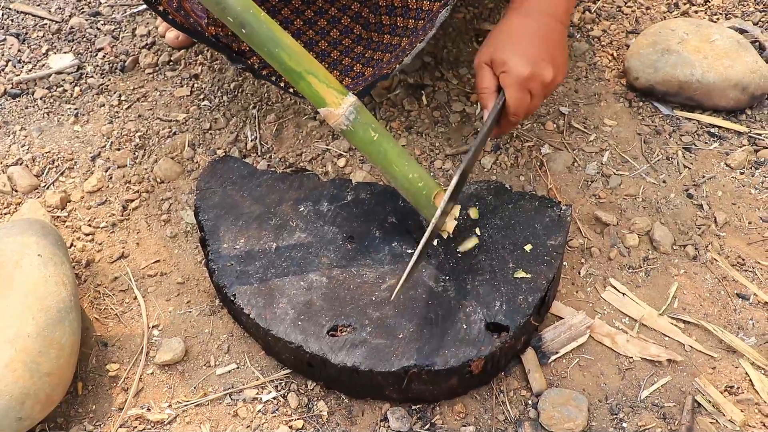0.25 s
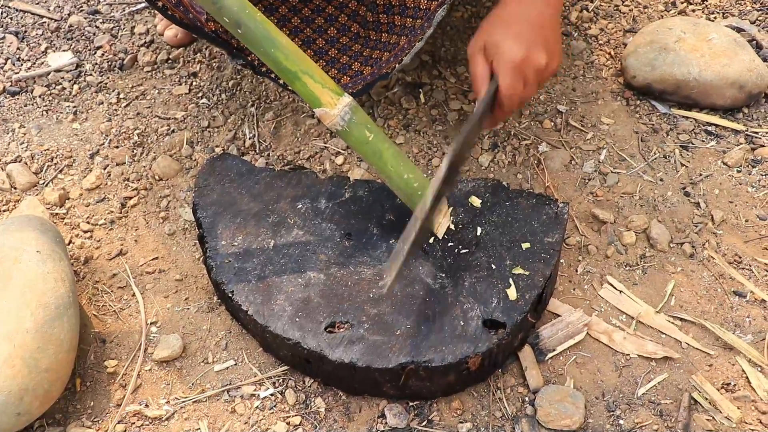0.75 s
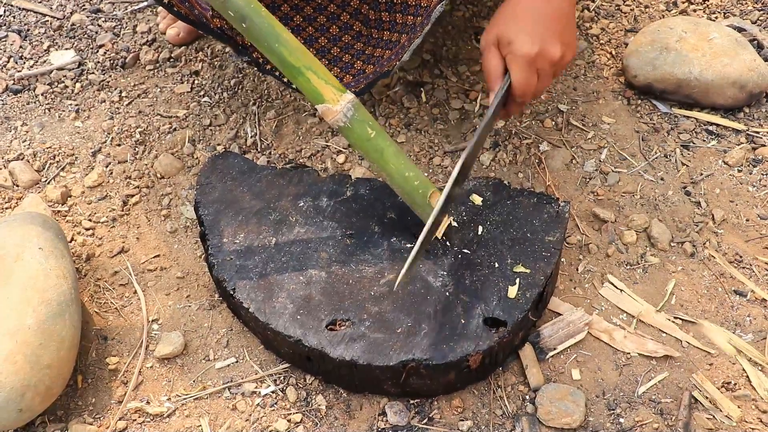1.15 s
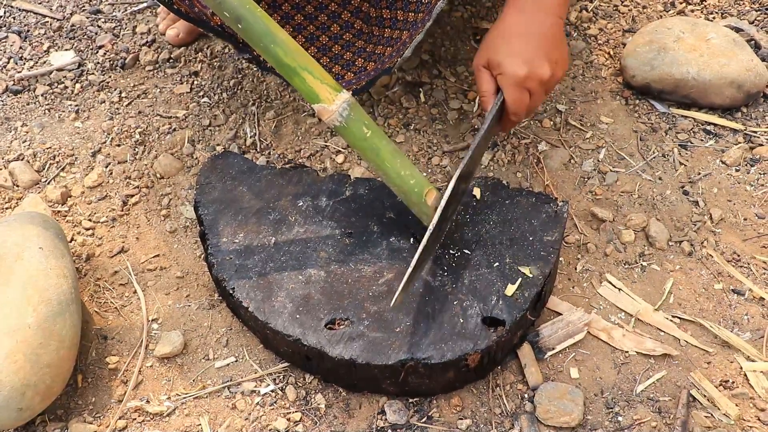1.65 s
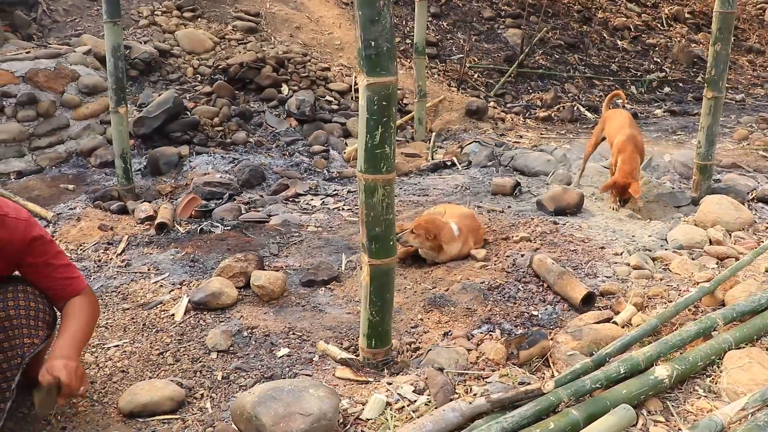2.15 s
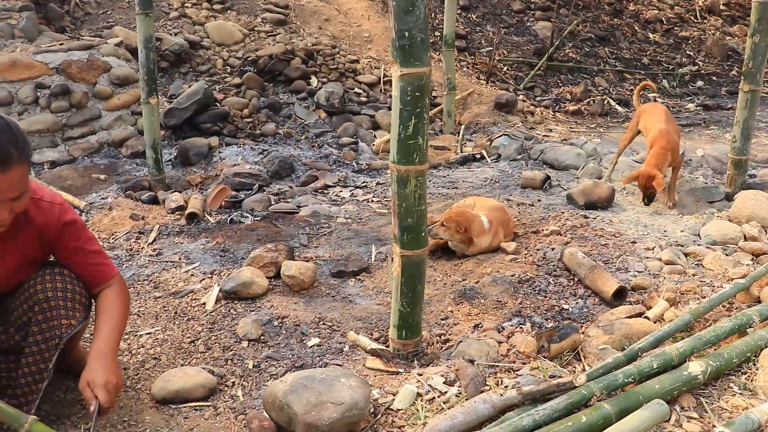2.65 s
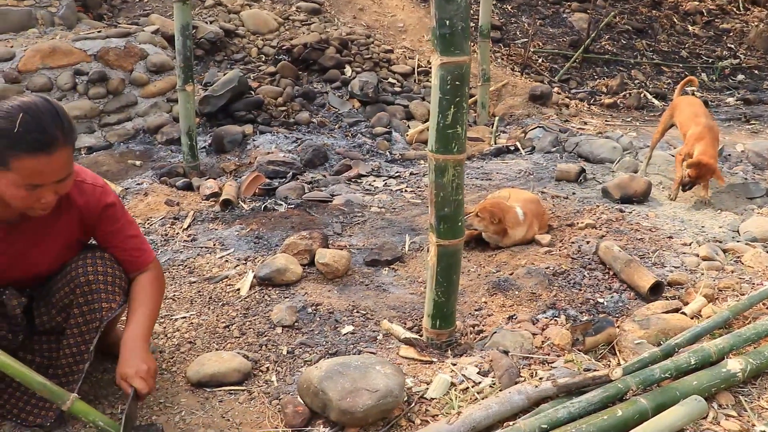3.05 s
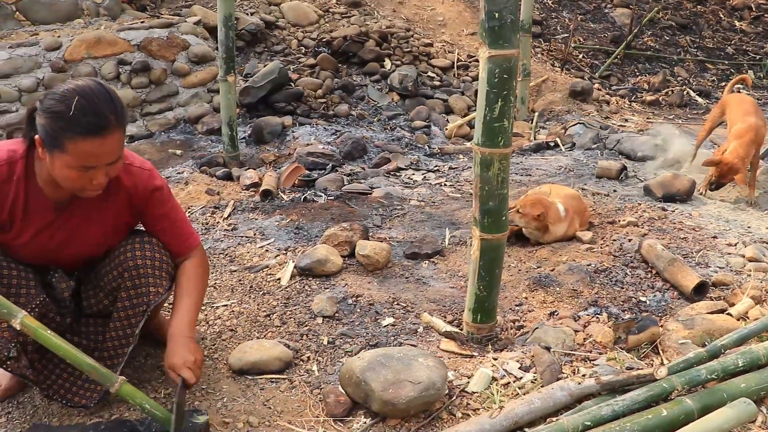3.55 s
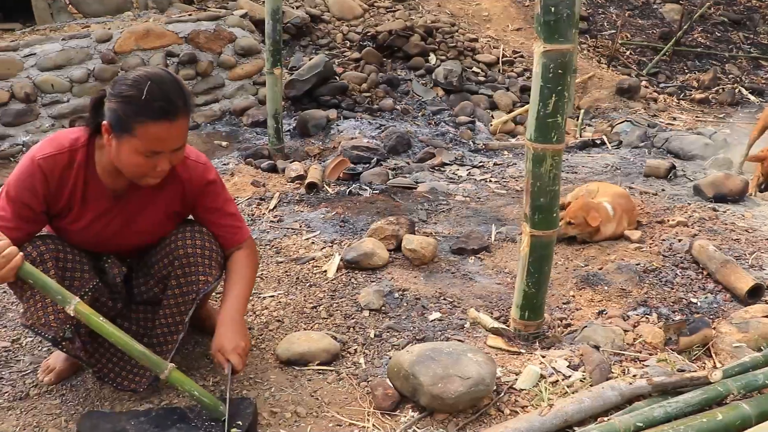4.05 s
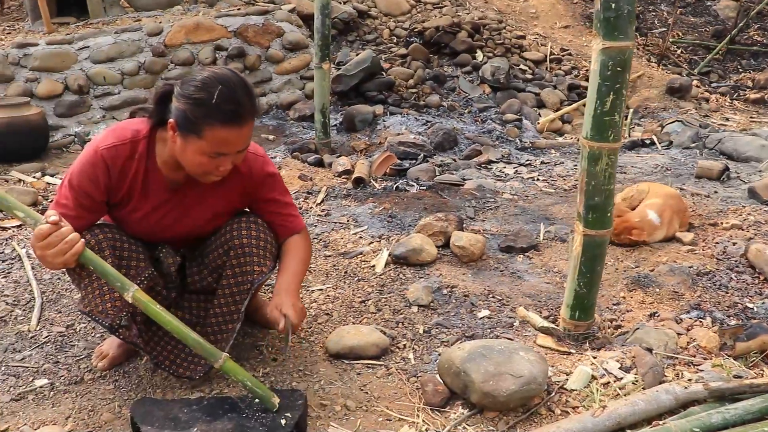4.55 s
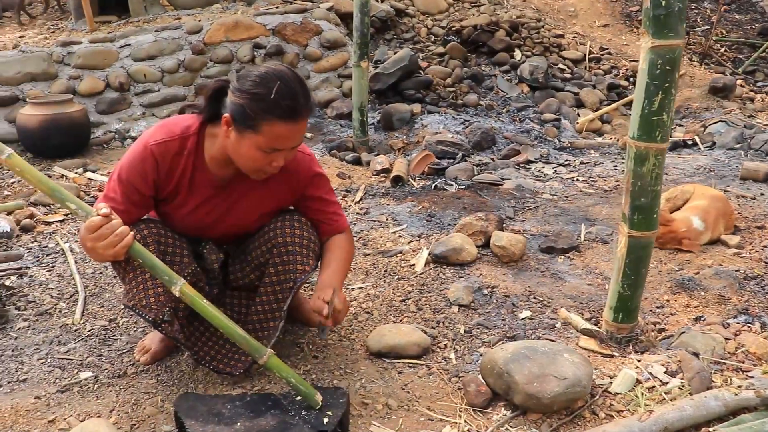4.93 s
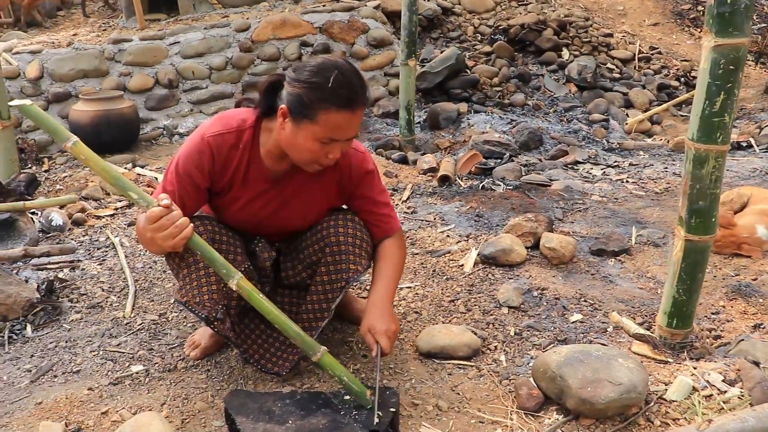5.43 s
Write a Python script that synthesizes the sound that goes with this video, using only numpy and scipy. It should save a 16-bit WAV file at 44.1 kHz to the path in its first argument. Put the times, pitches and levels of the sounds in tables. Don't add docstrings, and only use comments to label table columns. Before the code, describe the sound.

A heavy blade chops green bamboo on a wooden block outdoors while a chick peeps, then chopping continues slightly further off after a brief silence.

```python
import sys
import numpy as np
from scipy import signal
from scipy.io import wavfile
from scipy.ndimage import uniform_filter1d

SR = 44100
rng = np.random.default_rng(int(sys.argv[2]) if len(sys.argv) > 2 else 0)


def voltage_ratio(decibels):
    exponent = np.asarray(decibels, float) / 20
    return 10 ** exponent


def int16_out(signal):
    q = np.round(np.clip(np.atleast_2d(signal).T, -1, 1) * 32767)
    wavfile.write(sys.argv[1], SR, q.astype(np.int16))


N = 250929

GAP = (1.666, 1.869)


def evened(x):
    return x / np.sqrt(np.mean(x ** 2) + 1e-20)


def peaked(x):
    return x / (abs(x).max() + 1e-20)


def read(points, hz):
    f, value = np.transpose(points)
    return np.interp(np.log(hz + 1), np.log(f + 1), value)


def add(mix, s, sound):
    part = mix[round(s * SR):][:len(sound)]
    part += sound[:len(part)]


def ring(modes):
    t = np.arange(SR // 8) / SR
    return sum(voltage_ratio(db - 60 * t / t60) * np.sin(2 * np.pi * hz * t) for hz, db, t60 in modes)


def band(x, hz, octaves):
    edges = np.clip([hz / 2 ** octaves, hz * 2 ** octaves], 30, SR / 2 - 500)
    return signal.sosfilt(signal.butter(2, edges, "bandpass", fs=SR, output="sos"), x)


def without_bass(x, hz, order):
    return signal.sosfilt(signal.butter(order, hz, "highpass", fs=SR, output="sos"), x)


def air():
    # Hz, dB per Hz.
    near_colour = [(15, -28.5), (28, -5.5), (65, -2), (140, -10), (230, -9.5), (350, -14), (900, -11),
                   (1350, -10), (1650, -16), (2200, -14), (4000, -23.5), (6300, -27), (7200, -33),
                   (11500, -34), (15800, -33.5)]
    # Hz, dB per Hz.
    away_colour = [(15, -40), (28, 1), (70, 5.5), (130, -6), (230, -3), (380, -8.5), (750, -4), (1300, -7),
                   (1700, -10), (3000, -14.5), (4500, -19.5), (6000, -22), (7600, -26.5), (11500, -27),
                   (15800, -30)]
    # time in seconds, dB.
    breeze = [(1.87, -1.64), (2.9, -1), (3.4, 0.43), (5.7, 1.57)]
    frames, hz = N // 256 + 5, np.fft.rfftfreq(1024, 1 / SR)
    a, b, patches = rng.standard_normal((frames, 513, 3)).T
    patches = evened(uniform_filter1d(uniform_filter1d(patches, 20, 0), 10, 1))
    haze = rng.standard_normal((513, frames))
    haze = evened(uniform_filter1d(uniform_filter1d(haze, 70, 0), 40, 1))
    haze_db = 1.3 * haze * np.clip(hz / 5000, 0, 1)[:, None]
    z = (a + 1j * b) * voltage_ratio(.8 * patches + haze_db)

    def coloured(colour):
        shaped = z * voltage_ratio(read(colour, hz))[:, None]
        return evened(signal.istft(shaped, nperseg=1024, noverlap=768)[1][:N])

    near = voltage_ratio(-57.5) * coloured(near_colour)
    breeze_db = np.interp(np.arange(N) / SR, *np.transpose(breeze))
    away = voltage_ratio(-58.5 + breeze_db) * coloured(away_colour)
    return np.where(np.arange(N) < GAP[0] * SR + 99, near, away)


def grit():
    per_s, level_db = 30, -74
    chance, size, hiss = rng.random((2, N)), rng.exponential(1, (2, N)), rng.standard_normal((2, N))
    clumps = voltage_ratio(3.9 * evened(uniform_filter1d(rng.standard_normal((2, N)), 6000)))
    landings = (chance < clumps * per_s / SR) * voltage_ratio(4.0 * np.minimum(size, 3))
    dull, bright = signal.lfilter([1], [1, -np.exp(-1 / (0.0018 * SR))], landings) * hiss
    return voltage_ratio(level_db) * (band(dull, 5700, .25) * voltage_ratio(0.5) + band(bright, 11500, .3))


def phrase(start, glide, top_hz, db, hook_db, drop, low_hz, scoop_hz, hook):
    sag_hz = 4200 * glide
    hook_s, hook_hz = hook * .015, hook * 480
    octave_db = -64
    knee = start + glide
    knee_hz = top_hz - sag_hz
    low = knee + drop
    return [(start, top_hz - scoop_hz, db - 8.5, octave_db - 10),
            (start + .008, top_hz - 0.1 * sag_hz, db - 0.5, octave_db - 7.5),
            (start + .55 * glide, top_hz - .42 * sag_hz, db - 2.5, octave_db),
            (knee, knee_hz, db, octave_db - 3.5),
            (knee + 0.54 * drop, .45 * knee_hz + .55 * low_hz, hook_db - 4.5, octave_db - 6),
            (low, low_hz, hook_db - 0.5, octave_db - 6.5),
            (low + hook_s, low_hz + hook_hz, hook_db - 4, octave_db - 17),
            (low + 1.5 * hook_s, low_hz + .8 * hook_hz, hook_db - 25, octave_db - 35.5)]


def peep(rows):
    # Hz, dB.
    path = [(4000, -1.5), (4150, 4), (4300, 0), (4480, 1.5), (4620, -2.5), (4750, -0.5), (4830, 6.5),
            (5200, -2)]
    # Hz, dB.
    octave_path = [(8000, 1.5), (8500, -6), (8950, -0.1), (9200, 3), (9600, -1.5), (10200, 6.5), (11200, 2)]
    s, *columns = np.transpose(rows)
    t = np.arange(s[0], s[-1], 1 / SR)
    hz, db, octave_db = (np.interp(t, s, c) for c in columns)
    turn = 2 * np.pi * np.cumsum(uniform_filter1d(hz, 100, mode="nearest")) / SR
    flutter = voltage_ratio(2.6 * evened(uniform_filter1d(rng.standard_normal(len(t)), 120)))
    patchy = uniform_filter1d(uniform_filter1d(rng.standard_normal(len(t)), 400), 200)
    patchy_db = 2.5 * evened(patchy)
    tone = voltage_ratio(db - patchy_db + read(path, hz)) * np.sin(turn)
    overtones = np.sin(2 * turn) + voltage_ratio(-18) * np.sin(3 * turn)
    tone += voltage_ratio(octave_db + read(octave_path, 2 * hz) + patchy_db) * overtones
    return s[0], np.sqrt(2) * tone * flutter * signal.windows.tukey(len(t), .08)


def chick():
    # start in seconds, glide in seconds, top Hz, level dB, hook dB.
    peeps = [(.0, .12, 4545, -55.5, -54), (0.216, 0.073, 4700, -62, -65), (.408, .083, 4742, -53.5, -46),
             (.595, 0.071, 4780, -52, -48), (.78, 0.05, 4815, -52, -46), (.936, 0.053, 4853, -52.5, -42),
             (1.107, 0.042, 4836, -53, -54)]
    # start and glide in seconds, top Hz, level dB, hook dB.
    cheeps = [(1.264, 0.028, 5150, -61, -45), (1.411, .03, 5680, -57, -50)]
    track = np.zeros(N)
    for row in peeps:
        add(track, *peep(phrase(*row, drop=.023, low_hz=4020, scoop_hz=0, hook=.94)))
    for row in cheeps:
        add(track, *peep(phrase(*row, drop=.022, low_hz=4630, scoop_hz=249.5, hook=.35)))
    return track


def far_call(length, first_hz, last_hz, db):
    u = np.arange(0, 1, 1 / (length * SR))
    hz = first_hz + (last_hz - first_hz) * u ** .55
    db = db + 3 * evened(uniform_filter1d(rng.standard_normal(len(u)), 200))
    tone = np.sin(2 * np.pi * np.cumsum(hz) / SR)
    return np.sqrt(2) * voltage_ratio(db) * tone * np.minimum(u / 0.28, 1) * (1 - u) ** 0.72


def far_birds():
    # start in seconds, length in seconds, first Hz, last Hz, level dB.
    calls = [(.075, .043, 1140, 930, -49.5), (.30, .12, 947, 890, -57.5), (.576, .062, 7700, 4300, -59),
             (1.567, .042, 4790, 4930, -65), (.66, .016, 1150, 1020, -50), (.853, .18, 441, 650, -55.5),
             (.89, .076, 1806, 2100, -57.5), (2.121, .038, 5200, 5100, -62),
             (3.939, .024, 1164, 1130, -51.5)]
    track = np.zeros(N)
    for s, *row in calls:
        add(track, s, far_call(*row))
    return track


def yard(x):
    # Hz, t60 in seconds.
    answer = [(200, 0.49), (800, 0.047), (2500, 0.11), (6000, 0.13), (14000, 0.052)]
    taps = np.zeros(SR // 2)
    at = np.arange(200, len(taps) - 20, 20)
    taps[at + rng.integers(0, 20, len(at))] = rng.choice([-1., 1.], len(at))
    hz, t, z = signal.stft(taps, SR, nperseg=256)
    tail = signal.istft(z * voltage_ratio(-60 * t / read(answer, hz)[:, None]), SR, nperseg=256)[1]
    return signal.fftconvolve(x, tail / np.linalg.norm(tail))[:N]


def cut(db, tear, body_db, edge_db, dry_db, rings):
    # Hz, dB, t60 in seconds.
    body = [(700, -9.5, .012), (965, 6.5, 0.011), (1250, 6.5, 0.025), (1664, 0, 0.028)]
    # Hz, dB, t60 in seconds.
    wall = [(2100, 2.5, .007), (2660, 4.5, 0.0053), (3056, 4, .006), (3690, -12, 0.0025)]
    # Hz, dB, t60 in seconds.
    edge = [(4500, 10.5, 0.0037), (5200, 2.5, .004), (5440, -9, 0.0012), (7170, -2, 0.0045),
            (8000, -8, 0.0056)]
    # low Hz, high Hz.
    crackle_hz = (6800, 12500)
    noise = rng.standard_normal((2, 6000))
    t = np.arange(6000) / SR
    late = np.maximum(t - tear, 0)
    snaps = noise[0] * voltage_ratio(3.0 * noise[1]) * np.minimum(t / 0.0017, 1)
    out = np.zeros(len(t))

    def rung(force, modes):
        return peaked(signal.fftconvolve(snaps * force, ring(modes))[:len(t)])

    for modes, rel_db, fast, rest_db, slow in ((body, body_db, .03, -22, .12), (wall, 0, .03, -20, .11),
                                               (edge, edge_db, .025, -20, .1)):
        force = voltage_ratio(-60 * late / fast) + voltage_ratio(rest_db - 60 * late / slow)
        out += voltage_ratio(rel_db - 2.5) * rung(force, modes)
    shake = voltage_ratio(-60 * late / 0.0049) + voltage_ratio(-18.5 - 60 * late / .06)
    for hz, ring_db, t60 in rings:
        out += voltage_ratio(ring_db) * rung(shake, [(hz, 0, t60), (hz * 1.04, -9, .5 * t60)])
    force = voltage_ratio(-60 * np.maximum(t - 0.39 * tear, 0) / 0.015)
    force += voltage_ratio(-22.0 - 60 * late / 0.036) + voltage_ratio(-29.5 - 60 * late / 0.24)
    crackle = signal.sosfilt(signal.butter(3, crackle_hz, "bandpass", fs=SR, output="sos"), snaps * force)
    return voltage_ratio(db) * (out + voltage_ratio(dry_db) * peaked(crackle))


def cuts():
    # start in seconds, wall peak dB, tear in seconds, body dB, brightness dB.
    entries = [(.1405, -15, 0.0061, 1, -9), (.5076, -32, 0.0095, 6, 3), (3.625, -17.5, 0.0044, -5.5, 3),
               (4.060, -19.5, 0.003, -14, -0.5), (4.798, -19, 0.0015, -20, -4),
               (5.438, -17.5, 0.0079, -9, 6.5)]
    # start in seconds, wall peak dB, tear in seconds, body dB, brightness dB.
    splits = [(.154, -15.5, 0.009, -4.5, -3), (.520, -18, .0033, -5, -1.5)]
    # start in seconds, wall peak dB, tear in seconds, body dB, brightness dB.
    trims = [(.836, -16.5, .0085, -4.5, 0), (1.164, -12.5, .008, -6, -5.5), (1.468, -17, 0.0077, -16, -9)]
    # start in seconds, wall peak dB, tear in seconds, body dB, brightness dB.
    glances = [(1.875, -19, 0.006, -12.5, -5), (2.424, -21, 0.0092, -12, 1),
               (3.047, -16, 0.0096, -25.5, 1.5), (4.431, -21, 0.0075, -22.5, 4.5),
               (5.123, -18, 0.0081, -9, 1)]
    # start in seconds, wall peak dB, tear in seconds, body dB, brightness dB.
    throughs = [(3.632, -12, 0.0073, -3.5, -2), (4.064, -13.5, 0.0076, 2, -0.5),
                (4.444, -19, 0.0058, -6, 0), (4.801, -11.5, 0.00596, 1.5, -17),
                (5.445, -16, 0.0053, -11, 4)]
    # Hz, dB, t60 in seconds.
    entry_ring = [(830, -20, 0.012), (3150, -11.5, 0.0067), (8000, -6, 0.0074), (9100, -13.5, .025)]
    # Hz, dB, t60 in seconds.
    split_ring = [(1400, -13, 0.06), (2280, -3.5, .035), (3300, -10.5, .025), (5600, -15, .04)]
    # Hz, dB, t60 in seconds.
    trim_ring = [(851, -14, 0.037), (1622, -9, 0.04), (2300, -13.5, .025), (3430, -8, 0.018),
                 (4700, -16, 0.018), (5050, -20, .022), (9670, -19.5, 0.024)]
    # Hz, dB, t60 in seconds.
    glance_ring = [(563, -15, 0.013), (1625, -15, 0.025), (2640, -22, 0.045), (3060, -14.5, 0.042),
                   (3520, -19.5, 0.013), (4203, -21, .03), (5520, -14, .015)]
    # Hz, dB, t60 in seconds.
    through_ring = [(572, -15, .022), (836, -14, 0.041), (1290, -5.5, 0.034), (1947, -17.5, 0.038),
                    (2423, -16, 0.051), (2960, -20, 0.05), (3240, -14.5, 0.04), (5150, -24, 0.035)]
    track = np.zeros(N)
    # blade edge dB, dry crackle dB
    for blows, rings, edge_db, dry_db in ((entries, entry_ring, -8.5, -4),
                                          (splits, split_ring, -5.5, -15.5),
                                          (trims, trim_ring, -.6, -1.2),
                                          (glances, glance_ring, -7.5, -3.1),
                                          (throughs, through_ring, -11, -26.5)):
        for s, db, tear, body_db, bright_db in blows:
            shifts = rng.standard_normal((len(rings), 2))
            own = [(hz * (1 + .012 * a), d + 1.5 * b, t60) for (hz, d, t60), (a, b) in zip(rings, shifts)]
            add(track, s, cut(db, tear, body_db, edge_db + 0.39 * bright_db, dry_db + bright_db, own))
    return without_bass(track, 480, 2)


def sing(db, hz, t60):
    noise = rng.standard_normal(6000)
    shake = noise[:500] * voltage_ratio(-60 * np.arange(500) / SR / .012)
    tone = np.convolve(shake, ring([(hz, 0, t60), (hz * 0.96, -9, 0.6 * t60)]))[:len(noise)]
    waver = evened(uniform_filter1d(uniform_filter1d(noise, 200), 100))
    return voltage_ratio(db) * peaked(tone * voltage_ratio(2.2 * waver))


def loose_strips():
    # start in seconds, peak dB, Hz, t60 in seconds.
    sings = [(0.521, -20, 1400, 0.045), (.838, -17, 830, 0.031), (.84, -31, 9540, .06),
             (1.47, -14.5, 826, 0.03), (2.426, -18, 2830, 0.035), (3.049, -28, 563, 0.03),
             (3.636, -28, 840, .13), (3.636, -26, 2990, .08), (4.071, -21, 2830, 0.045),
             (4.075, -31, 3010, 0.08), (4.803, -20, 640, 0.025), (4.068, -13, 1263, 0.024),
             (4.802, -17.5, 830, .03), (1.877, -24, 527, 0.045), (4.433, -22, 3520, 0.025),
             (5.125, -20, 3520, 0.02), (5.446, -19, 2525, 0.1), (4.803, -16, 3270, 0.045),
             (4.803, -35, 7154, 0.08), (4.804, -15, 1260, .022), (4.806, -26, 2960, .1),
             (4.801, -28, 5730, .08), (4.803, -38, 4470, .08), (4.806, -31, 872, .13),
             (3.634, -15, 1250, .025), (3.633, -19, 530, .07), (3.634, -23, 3270, .03),
             (3.627, -26, 5150, .065), (4.062, -29, 5170, .07), (5.440, -21, 7540, .035),
             (5.441, -33, 9400, .04), (5.449, -24, 3220, .04), (5.447, -33, 2920, .06),
             (5.448, -33, 800, .06), (4.436, -22, 2560, .04), (4.431, -27, 8200, .02),
             (4.446, -24, 3300, .045), (5.127, -26, 6100, .03), (5.13, -30, 2230, .05),
             (5.13, -33, 2630, .07), (2.426, -23, 1620, .025), (2.425, -28, 6800, .025),
             (3.049, -22, 1600, .022), (3.049, -22, 5500, .025), (3.049, -26, 6700, .03),
             (1.471, -19, 3300, .025), (1.471, -21, 2050, .04), (.522, -24, 5850, .04),
             (.155, -19, 2350, .03), (1.166, -24, 2000, .025)]
    track = np.zeros(N)
    for s, *row in sings:
        add(track, s, sing(*row))
    return track


def thud(db, hz):
    # Hz, dB, t60 in seconds.
    sway = [(150, -13, .12), (228, -6, .1), (320, -2, .04), (410, -1, .04)]
    push = signal.windows.hann(round(0.0009 * SR))
    return voltage_ratio(db) * peaked(np.convolve(ring([(hz, 0, .045)] + sway), push))


def thuds():
    # start in seconds, peak dB, Hz.
    presses = [(0.158, -23, 230), (0.519, -25, 230), (0.682, -49, 151), (0.836, -44.5, 200),
               (1.166, -38.5, 200), (1.467, -43.5, 199), (1.876, -33.5, 260), (2.424, -31.5, 189),
               (2.636, -50, 192.4), (3.048, -36, 195.8), (3.635, -29.5, 230), (4.066, -27, 230),
               (4.432, -38.5, 195), (4.801, -24.5, 241), (5.121, -41.5, 170), (5.443, -31.5, 243)]
    track = np.zeros(N)
    for s, *row in presses:
        add(track, s, thud(*row))
    return track


def knock(db, hz, rise, cane_db):
    # Hz, dB, t60 in seconds.
    block = [(230, -6.5, 0.038), (586, -14.5, 0.033), (867, 18, 0.062), (1400, -7, .04), (2307, -13, .05),
             (2800, -20.5, .06), (3250, -47, .05), (5750, -15.5, .03)]
    t60 = .013
    cluster = ring([(hz * .92, -2, t60), (hz * 1.02, -1.5, t60 * 1.4),
                    (hz * 1.6, -12, t60), (hz * 0.49, -12, t60)])
    settle = np.minimum(np.arange(len(cluster)) / SR / rise, 1)
    swell = voltage_ratio(60 * rise / t60 * settle)
    both = peaked(cluster * settle * swell) + voltage_ratio(cane_db) * peaked(ring(block))
    push = signal.windows.hann(round(.0003 * SR) + 2)
    return -voltage_ratio(db) * peaked(np.convolve(both, push))


def knocks():
    # start in seconds, peak dB, main ring Hz, rise in seconds, cane ring dB.
    landings = [(.159, -2, 830, 0.00093, -29.5), (.1885, -21, 791, 0.0027, -7.5),
                (.5197, 1, 830, 0.0019, -32), (.5585, -20, 830, .0011, -28),
                (3.634, -16.5, 1195, 0.0029, -8), (4.0648, -7, 1246, 0.0028, -11.5),
                (4.8005, -10.5, 1250, 0.0028, -10.5)]
    track = np.zeros(N)
    for s, db, *row in landings:
        hz = row[0]
        rebound_s = max(round(.0036 * hz), 1) / hz
        add(track, s + rebound_s, knock(db - 10.5, *row))
        add(track, s, knock(db, *row))
    return track


def chip(db, hz, length, octaves):
    noise = rng.standard_normal(2000)
    t = np.arange(len(noise)) / SR
    scratch = noise * np.minimum(t / length / 0.69, 1) * np.exp(-t / length)
    return voltage_ratio(db) * peaked(band(scratch, hz, octaves))


def debris():
    # start in seconds, peak dB.
    specks = [(.545, -54), (.72, -60), (2.127, -43.5), (3.229, -49.5), (3.268, -51), (3.301, -49),
              (3.558, -56), (3.786, -51), (3.81, -52), (4.27, -54), (4.35, -54.5), (4.588, -49.5),
              (4.622, -54), (4.828, -44), (4.977, -52), (5.299, -47.5), (5.323, -51), (5.471, -58),
              (5.512, -43), (5.562, -51.5), (5.594, -59)]
    # start in seconds, peak dB, centre Hz.
    glints = [(1.985, -58, 5600), (2.202, -57, 5800), (3.19, -59, 10800), (3.22, -60, 10500),
              (3.238, -58, 14000), (3.31, -58, 11500), (3.347, -59, 10500), (3.385, -57, 11000),
              (3.597, -58, 11000), (3.905, -57, 4000), (4.09, -52, 12000), (4.127, -58, 11000),
              (4.138, -58, 11000), (4.213, -59, 13000), (4.70, -59, 10500), (5.657, -57, 6000),
              (5.578, -61, 12500), (.718, -58, 12000), (.763, -59, 12000)]
    # start in seconds, peak dB, centre Hz.
    chips = [(.736, -51.5, 7000), (.769, -54.5, 5500), (1.017, -47.5, 8000), (1.086, -49.5, 6000),
             (1.105, -54.5, 6050), (2.325, -54, 6650), (2.525, -51.5, 5000), (2.6, -56, 6020),
             (2.62, -47, 2510), (2.73, -57.5, 6000), (3.118, -44, 1500), (3.403, -42.5, 1496),
             (3.471, -36.5, 4680), (3.485, -40.5, 4500), (3.538, -53, 4000), (3.578, -49, 4000),
             (3.739, -47, 8500), (4.737, -50.5, 8000), (5.229, -54, 6060)]
    track = np.zeros(N)
    for s, db in specks:
        add(track, s, chip(db, 8000, .0023, 1))
    for s, db, hz in glints:
        add(track, s, chip(db, hz, .0018, .25))
    for s, db, hz in chips:
        add(track, s, chip(db, hz, .0027, .54))
    return track


def hushed(x):
    # start in seconds, length in seconds.
    hushes = [(.821, .012), (1.147, .014), (3.028, .015), (3.608, .014), (4.048, .009), (4.419, .008),
              (5.114, .006), (5.419, .016)]
    t = np.arange(N) / SR
    hush = uniform_filter1d(sum(1. * (t > s) * (t < s + length) for s, length in hushes), 100)
    treble = x - signal.oaconvolve(x, signal.firwin(127, 3500, fs=SR)[None], "same")
    return x - hush * (1 - voltage_ratio(-16)) * treble


def bounce(db, hz):
    fall = ring([(150, -1, .05), (hz, -5, .04)])
    return voltage_ratio(db) * peaked(np.convolve(fall, signal.windows.hann(round(0.00089 * SR))))


def bounces():
    # start in seconds, peak dB, ring Hz.
    drops = [(1.965, -52, 601), (2.52, -48, 600), (3.135, -43.5, 590), (3.727, -41, 520), (4.158, -37, 606),
             (4.53, -50.5, 600), (4.888, -42, 610), (5.221, -45.5, 600), (5.531, -43, 600)]
    track = np.zeros(N)
    for s, *row in drops:
        add(track, s, bounce(*row))
    return track


def scene():
    birds = chick() + far_birds()
    chops = without_bass(cuts() + loose_strips() + knocks() + debris(), 433, 3)
    ground = without_bass(thuds() + bounces(), 90, 2)
    echo = yard(voltage_ratio(-19.0) * chops + voltage_ratio(-21) * birds)
    return (chops + ground + birds + echo + grit() + air())[None]


def top_cut(x):
    return signal.sosfilt(signal.butter(12, 16980, fs=SR, output="sos"), x)


def record(dry):
    t = np.arange(N) / SR
    heard = np.clip(np.maximum(GAP[0] - t, t - GAP[1]) / 0.0017, 0, 1)
    low = signal.oaconvolve(dry, signal.firwin(255, 15950, fs=SR)[None], "same")
    limited = low + voltage_ratio(-26) * (dry - low)
    return top_cut(np.clip(hushed(limited) * heard, -1, 1))


dry = scene()
out = record(dry)
int16_out(out)
```